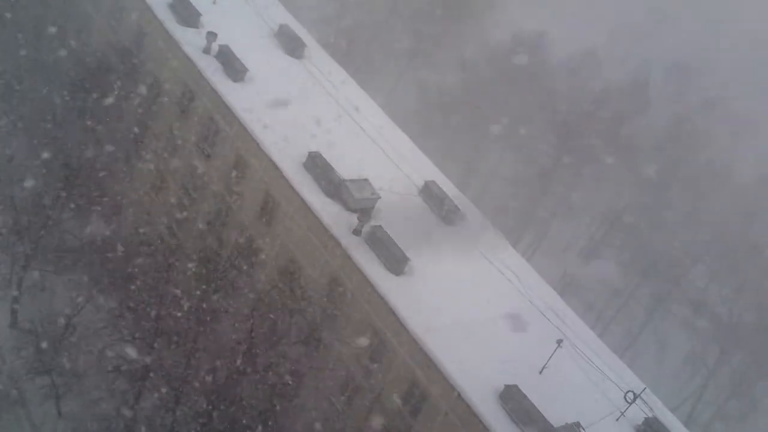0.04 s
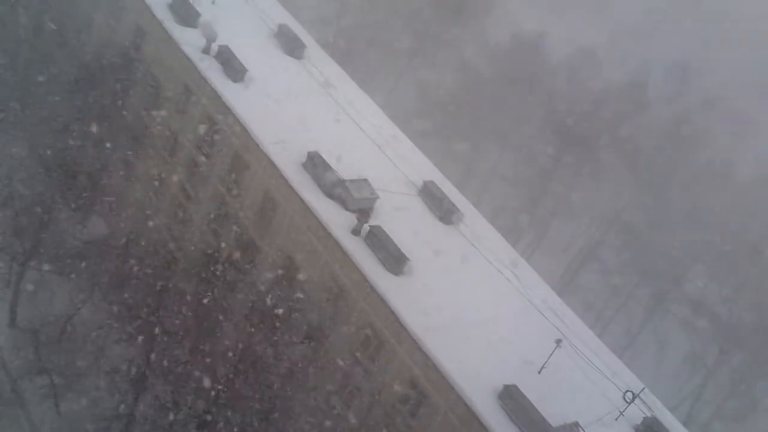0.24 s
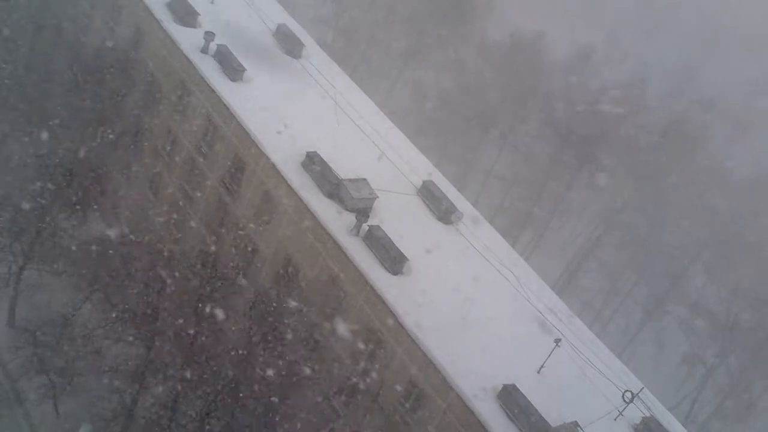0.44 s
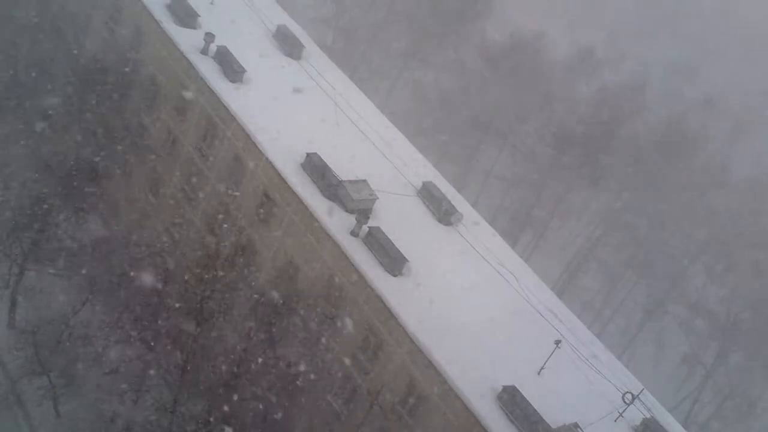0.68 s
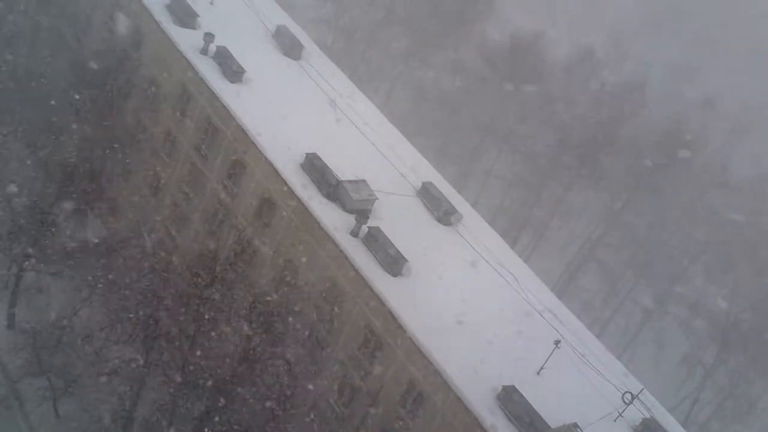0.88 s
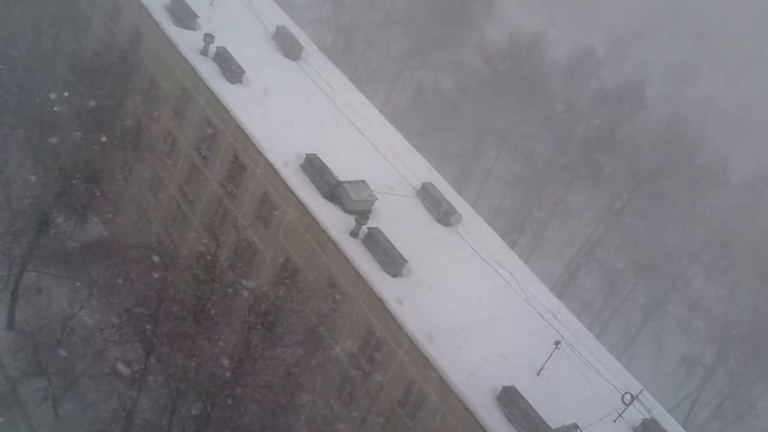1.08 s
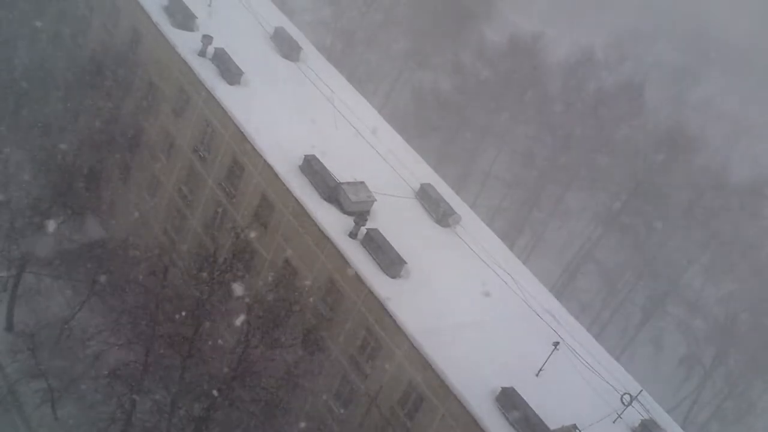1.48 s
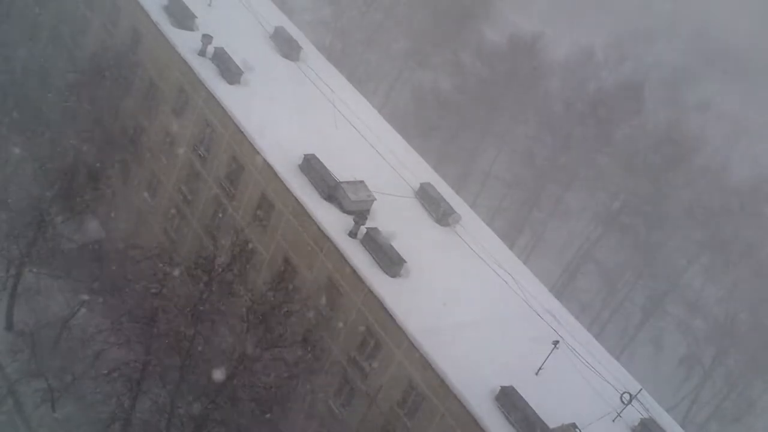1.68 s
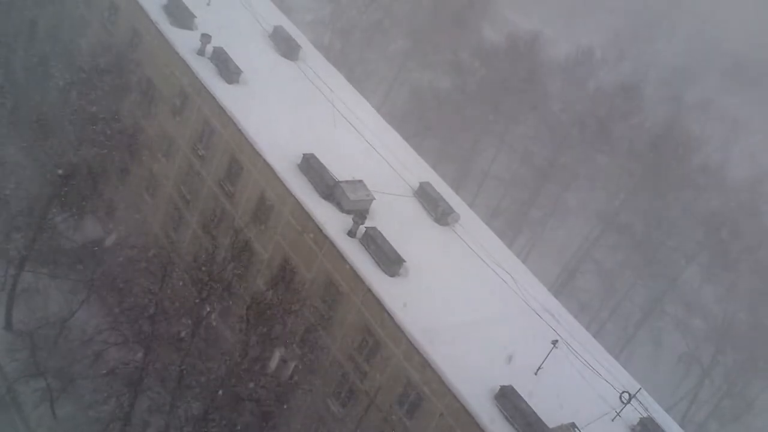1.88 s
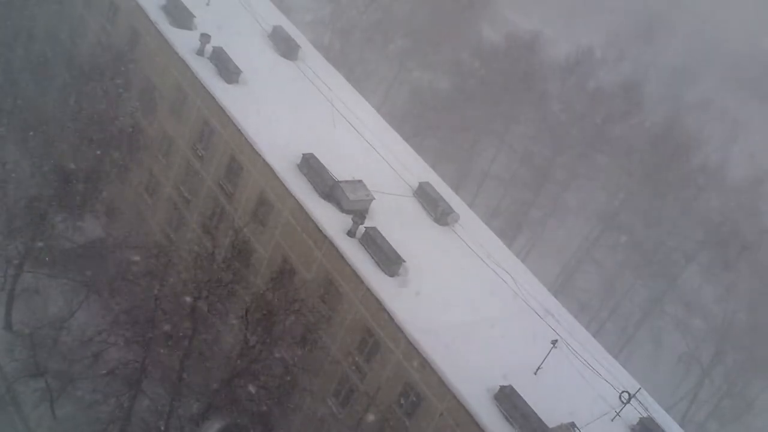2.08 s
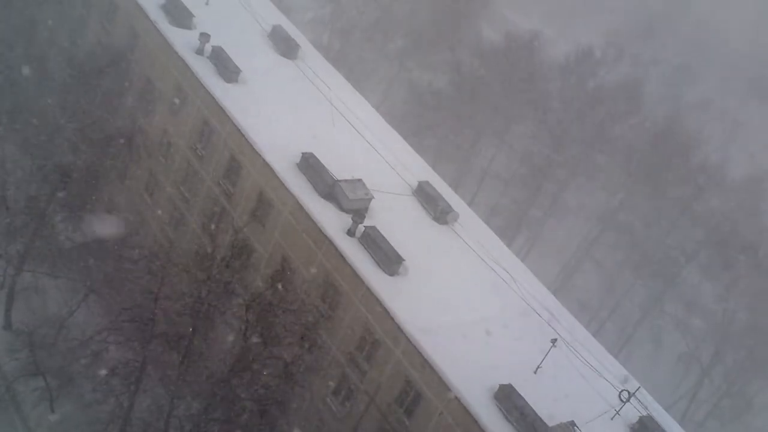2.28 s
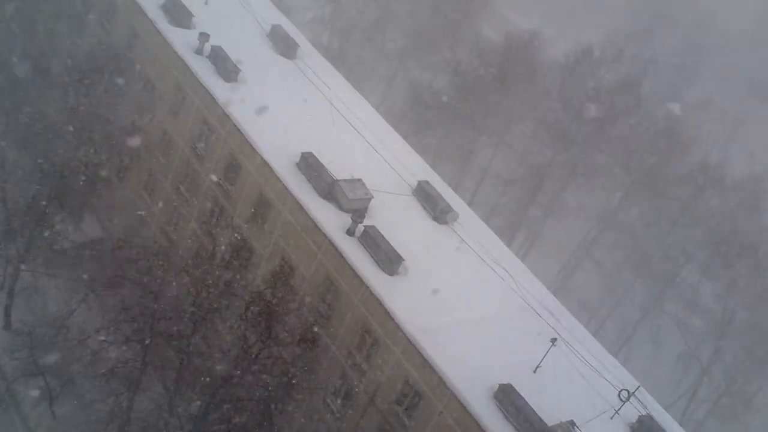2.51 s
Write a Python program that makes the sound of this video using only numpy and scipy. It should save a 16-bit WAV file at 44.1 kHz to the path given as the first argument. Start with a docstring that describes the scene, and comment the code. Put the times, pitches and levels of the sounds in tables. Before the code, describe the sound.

Wind rumbles on the microphone in uneven, fluttering gusts from about 0.2 seconds, with close thumps and small pops. It drops briefly at 1.3 seconds, hits hardest around 2.1 and eases after 2.4. A soft town wash and airy hiss lie underneath. The camera case clicks at 0.6 seconds, then ticks faintly near 1.8 and 2.1. A thin, distant whistle wavers upward from 1.5 to 2 seconds.

```python
"""Gusts rumble and thump on the microphone of a hand-held camera, at an open window in snowfall.
The wind is light; single eddies hit the microphone close up, and some break on its port with a pop.
From outside come the soft wash of the town and the hiss and breathy swells of the breeze.
A thin whistle rises once, far off across the yard, and the camera's case ticks in the hand."""
import sys
import numpy as np
from scipy import signal
from scipy.fft import rfft, irfft, next_fast_len
from scipy.io import wavfile
from scipy.ndimage import uniform_filter1d

SR = 44100
rng = np.random.default_rng(int(sys.argv[2]) if len(sys.argv) > 2 else 0)


def bounce(signal):
    """Save signal as a 16-bit WAV file at the path given by the first command-line argument."""
    frames = np.transpose(np.atleast_2d(signal))
    limited = np.clip(frames, -1, 1)
    pcm = np.round(limited * 32767).astype(np.int16)
    wavfile.write(sys.argv[1], SR, pcm)


N = 116865

# wind on the microphone (time [s], level [dB])
GUST_LEVEL = [(0, -37.5), (.2, -44), (.24, -28), (.39, -20.5), (.43, -27), (.5, -28), (.55, -36.5),
              (.575, -24), (.63, -23.5), (.68, -32), (.78, -29), (.83, -24), (.885, -19.5), (.915, -32.5),
              (.96, -26.5), (1.19, -27), (1.24, -31.5), (1.29, -56), (1.335, -23.5), (1.385, -34.5),
              (1.45, -25), (1.53, -21.5), (1.59, -27), (1.68, -29.5), (1.78, -23), (1.9, -26.5),
              (1.96, -27.5), (2.07, -26), (2.13, -19.5), (2.18, -29), (2.22, -25.5), (2.27, -35),
              (2.3, -24), (2.355, -24.5), (2.38, -40), (2.5, -54), (2.58, -57), (2.615, -33.5), (2.65, -43)]
# rumble of a moderate gust (frequency [Hz], density [dB])
RUMBLE_SPECTRUM = [(15, -40.5), (30, -24.5), (50, -10.5), (80, -2.5), (125, 2.5), (180, -1), (270, -4.5),
                   (400, -17), (600, -25), (1000, -41.5), (2000, -55.5), (5000, -88)]
# eddies on the microphone (time [s], level [dB], half length [s], swing rate [Hz], rasp level [dB])
EDDY_HITS = [(.283, -28.5, 0.0053, 193.2, -32), (.36, -22, 0.0017, 143.6, -25),
             (0.385, -23, 0.0022, 192, -35), (.402, -19.5, 0.0027, 208.5, -28),
             (0.572, -16, 0.0027, 189.7, -23.5), (.591, -14.5, 0.0025, 221.6, -34),
             (0.607, -14, 0.0053, 281, -27), (.671, -19.5, 0.0019, 168, -41), (.696, -22, 0.0026, 172, -38),
             (0.7055, -16.5, 0.0017, 235, -27), (.81, -17, 0.0037, 164, -29),
             (.856, -14.5, 0.0031, 249.4, -21), (0.869, -16.5, 0.0026, 205, -30),
             (0.961, -21.5, 0.0028, 200, -31), (1.111, -19, 0.0027, 225, -44),
             (1.167, -20, 0.0018, 216, -27.5), (1.177, -20, 0.0087, 166.6, -36),
             (1.338, -21.5, 0.0022, 134, -58), (1.511, -25, 0.0023, 293.4, -24),
             (1.539, -21.5, 0.0044, 150, -30), (1.772, -22.5, 0.0034, 220.8, -34.5),
             (1.8, -17.5, 0.0017, 186.4, -39), (1.865, -22.5, .004, 170.6, -43),
             (1.898, -12.5, 0.0019, 190.6, -24), (1.918, -25, 0.0038, 290.6, -24),
             (2.035, -10.5, 0.0042, 147.2, -26), (2.044, -14, 0.0023, 201.2, -29.5),
             (2.095, -23, 0.0054, 223, -26), (2.119, -14, 0.0068, 206.3, -24.5),
             (2.14, -14.5, 0.0063, 177.5, -25.5), (2.29, -19, 0.0029, 181, -33),
             (2.302, -17, 0.0024, 187, -23.5), (2.341, -13.5, 0.0037, 163, -32),
             (2.618, -29.5, 0.0072, 106.3, -58)]
# rasp at the height of an eddy (frequency [Hz], density [dB])
RASP_SPECTRUM = [(100, -20), (300, 5), (450, 3), (600, -9), (850, -15), (1200, -30.5), (2000, -36),
                 (4000, -70.5), (9000, -100)]
# eddies breaking on the microphone port (time [s], peak [dB], half width [s])
PORT_POPS = [(.3865, -14.5, 0.0006), (0.4043, -15, 0.00079), (0.709, -8.5, 0.00043), (.8515, -15, 0.0005),
             (0.862, -11, 0.00069), (1.5391, -10.5, 0.00061), (1.5541, -14, .00058), (1.9204, -13, 0.00088),
             (2.0303, -8.5, 0.00074)]
# the town through the window (frequency [Hz], density [dB])
TOWN_SPECTRUM = [(20, -12.5), (60, -1), (150, 1), (300, -3.5), (500, -4), (950, -6.5), (1250, -13.5),
                 (1600, -15), (2100, -20.5), (2600, -24.5), (3100, -28), (4200, -34.5), (6000, -42),
                 (7500, -45), (8800, -49.5), (10000, -54.5), (12900, -59), (13800, -57), (15000, -74)]
# airy hiss of the breeze outside (frequency [Hz], density [dB])
HISS_SPECTRUM = [(200, -25), (700, 5.5), (1300, 2.5), (2200, -5.5), (3300, -9.5), (4500, -20.5),
                 (6000, -27.5), (9000, -35), (13000, -44), (15000, -51)]
# rise and fall of that hiss (time [s], level [dB])
BREEZE_LEVEL = [(0, -41.5), (.15, -47), (.26, -42), (.36, -41), (.46, -44), (.7, -45.5), (.9, -64.5),
                (1.4, -54), (1.7, -50), (2.0, -51), (2.2, -62.5), (2.65, -52)]
# breathy bands in the breeze (time [s], half length [s], pitch [Hz], half width [Hz], level [dB])
BREEZE_SWELLS = [(.03, 0.15, 740, 302, -45), (.33, .08, 4300, 330, -60), (1.14, 0.22, 2540, 38, -61.5),
                 (1.699, 0.061, 2620, 95, -55), (1.857, 0.058, 2550, 131, -60)]
# far whistle (time [s], pitch [Hz], level [dB], octave level [dB])
WHISTLE_PATH = [(1.51, 2100, -68, -87), (1.536, 2140, -44.5, -71), (1.56, 2190, -43, -71),
                (1.59, 2195, -54, -72), (1.615, 2230, -47.5, -59.5), (1.642, 2280, -50, -71),
                (1.672, 2215, -45, -70.5), (1.705, 2327, -52, -76), (1.76, 2270, -57.5, -71),
                (1.805, 2240, -50.5, -73), (1.825, 2240, -56, -74), (1.848, 2225, -47.5, -69.5),
                (1.877, 2360, -51.5, -71.5), (1.9, 2290, -61, -75), (1.97, 2320, -56, -77.5),
                (2.04, 2340, -65, -83)]
# ticks of the case in the hand (time [s], level [dB], decay [s], centre [Hz], width [octaves])
CASE_TICKS = [(0.5644, -27, 0.00057, 6040, 1.7), (0.615, -48, .001, 7000, 1.4),
              (0.6168, -45.5, 0.0018, 7400, .8), (1.7655, -52, 0.00061, 10000, 0.66),
              (1.817, -59, 0.0015, 10800, 0.62), (2.1126, -45, 0.00049, 9000, 0.3),
              (2.361, -67, 0.0031, 8700, .2)]
# colour of the plastic case (frequency [Hz], gain [dB])
CASE_RESPONSE = [(1000, -7), (3400, 4.5), (4200, 0.5), (5300, 6), (6200, 2), (7000, -6), (8900, 3.5),
                 (10000, -5), (11700, -5), (12800, -7.5), (13800, -14), (15000, -26)]


def wind_rumble(flutter_db=2.5, flutter_hz=35.2, bright_hz=347, moderate_db=-23):
    """Turbulence right on the microphone: it flutters, and brightens as the gust grows."""
    air = noise(shape(RUMBLE_SPECTRUM))
    # even out the noise's own swells over 22 ms, so that the gust sets the level
    span, steadiness = int(.022 * SR), .93
    power = uniform_filter1d(uniform_filter1d(air ** 2, span), span)
    air = unit(air / (abs(power) + 1e-9) ** (steadiness / 2))
    level_db = curve(GUST_LEVEL) + flutter_db * drift(flutter_hz)
    top = colour(air, lambda f: 1 / (1 + (bright_hz / f) ** 4))
    top_gain = amp(.55 * (level_db - moderate_db))
    return amp(level_db) * (air - top + top * top_gain)


def eddy_thumps(wander=.19, wander_hz=145, size=4096):
    """Each eddy hits the microphone as a brief, uneven swing of pressure, rasping at its height."""
    out, t = np.zeros(N), (np.arange(size) - size / 2) / SR
    for time, db, half, hz, rasp_db in EDDY_HITS:
        rate = hz * (1 + wander * drift(wander_hz, size))
        turns = np.cumsum(rate) / SR + rng.random()
        swing = np.sqrt(2) * np.cos(2 * np.pi * turns) / np.cosh(t / half)
        envelope = 1 / np.cosh(t / (.99 * half))
        rasp = unit(envelope * noise(shape(RASP_SPECTRUM), size)) * np.sqrt(np.mean(envelope ** 2))
        add(out, time - size / 2 / SR, amp(db) * swing + amp(rasp_db) * rasp)
    return out


def port_pops(size=1024):
    """An eddy breaks on the microphone port: one quick push and pull of pressure."""
    out, t = np.zeros(N), (np.arange(size) - size / 2) / SR
    for time, db, half in PORT_POPS:
        push_pull = -t / half * np.exp(.5 - .5 * (t / half) ** 2)
        add(out, time - size / 2 / SR, amp(db) * push_pull)
    return out


def town_wash(level_db=-38, patch_db=1.27):
    """The town beyond the window: a soft wash, drifting in patches of time and frequency."""
    spectrogram = signal.stft(noise(shape(TOWN_SPECTRUM)), nperseg=1024)[2]
    patches = rng.standard_normal(spectrogram.shape[::-1])
    patches = uniform_filter1d(patches, size=9, axis=0)  # along time
    patches = unit(uniform_filter1d(patches, size=6, axis=1)).T  # along frequency
    wash = signal.istft(spectrogram * amp(patch_db * patches), nperseg=1024)[1][:N]
    return amp(level_db) * wash


def breeze_hiss():
    """Air moving outside the window, a hiss that rises and falls."""
    return amp(curve(BREEZE_LEVEL)) * noise(shape(HISS_SPECTRUM))


def breeze_swells():
    """Breathy bands of rushing air that swell and fade."""
    out, t = np.zeros(N), np.arange(N) / SR
    for time, half, hz, width, db in BREEZE_SWELLS:
        swell = np.exp(-.5 * ((t - time) / half) ** 2)
        out += amp(db) * swell * noise(lambda f: 1 / (1 + ((f - hz) / width) ** 2))
    return out


def far_whistle(wobble=.02, flicker_db=3, rough_hz=120, echo_s=.55, wet=.45):
    """A rough, wavering whistle and its octave in the distance, smeared by the yard's echo."""
    pitch = curve(WHISTLE_PATH) * (1 + wobble * drift(rough_hz))
    phase = 2 * np.pi * np.cumsum(pitch) / SR
    fundamental = amp(curve(WHISTLE_PATH, column=2)) * np.sin(phase)
    octave = amp(curve(WHISTLE_PATH, column=3)) * np.sin(2 * phase)
    flicker = unit(amp(flicker_db * drift(rough_hz)))
    tone = np.sqrt(2) * (fundamental + octave) * flicker
    tail = rng.standard_normal(N) * amp(-60 * np.arange(N) / SR / echo_s)
    echo = signal.fftconvolve(tone, tail / np.linalg.norm(tail))[:N]
    return np.sqrt(1 - wet ** 2) * tone + wet * echo


def case_ticks(crack_db=12, size=2048):
    """The plastic case snaps faintly in the hand: a crack, then a few milliseconds of rattle."""
    out, t = np.zeros(N), np.arange(size) / SR
    for time, db, decay, hz, octaves in CASE_TICKS:
        fall = np.exp(-t / decay)
        snap = amp(crack_db) * (t == 0) + fall * rng.standard_normal(size)
        band = lambda f: np.exp(-.5 * (np.log2(f / hz) / octaves) ** 2)
        snap = colour(np.pad(snap, (size, 0)), lambda f: shape(CASE_RESPONSE)(f) * band(f))
        add(out, time - size / SR, amp(db) * snap * np.linalg.norm(fall) / np.linalg.norm(snap))
    return out


def amp(db):
    """Decibels to gain."""
    return 10 ** (np.asarray(db) / 20)


def unit(x):
    """Scales to rms 1."""
    return x / np.sqrt(np.mean(x ** 2) + 1e-20)


def curve(rows, column=1):
    """One column of a time table, sample by sample."""
    rows = np.array(rows)
    return np.interp(np.arange(N) / SR, rows[:, 0], rows[:, column])


def shape(points):
    """A spectrum table as a function from Hz to gain."""
    hz, db = np.transpose(points)
    return lambda f: amp(np.interp(np.log(f), np.log(hz), db))


def colour(x, gain):
    """Filters by a gain that depends on frequency."""
    size = next_fast_len(len(x))
    return irfft(rfft(x, size) * gain(np.fft.rfftfreq(size, 1 / SR) + 1), size)[:len(x)]


def noise(gain, size=N):
    """Coloured noise of rms 1."""
    return unit(colour(rng.standard_normal(size), gain))


def drift(rate_hz, size=N):
    """Random wander of rms 1, up to a given rate."""
    return noise(lambda f: 1 / (1 + (f / rate_hz) ** 4), size)


def add(mix, time, sound):
    """Mixes a sound in at a time in seconds."""
    part = mix[max(round(time * SR), 0):][:len(sound)]
    part += sound[:len(part)]


def scene():
    """One microphone at the window: wind on it, the town outside, the case right beside it."""
    close_wind = wind_rumble() + eddy_thumps() + port_pops()
    outside = town_wash() + breeze_hiss() + far_whistle() + breeze_swells()
    return (close_wind + outside + case_ticks())[None]


def record(dry, low_cut_hz=48, notch_hz=7770, notch_width_hz=460, top_hz=15300):
    """The camera's microphone sheds the deepest bass, a narrow notch of treble and the very top."""
    notch = lambda f: abs(f - notch_hz) / np.hypot(f - notch_hz, notch_width_hz / 2)
    heard = colour(dry[0], lambda f: notch(f) / np.hypot(1, (low_cut_hz / f) ** 2))
    low_pass = signal.firwin(511, top_hz, window=("kaiser", 9), fs=SR)
    return signal.oaconvolve(heard, low_pass, "same")[None]


dry = scene()
out = record(dry)
bounce(out)
```